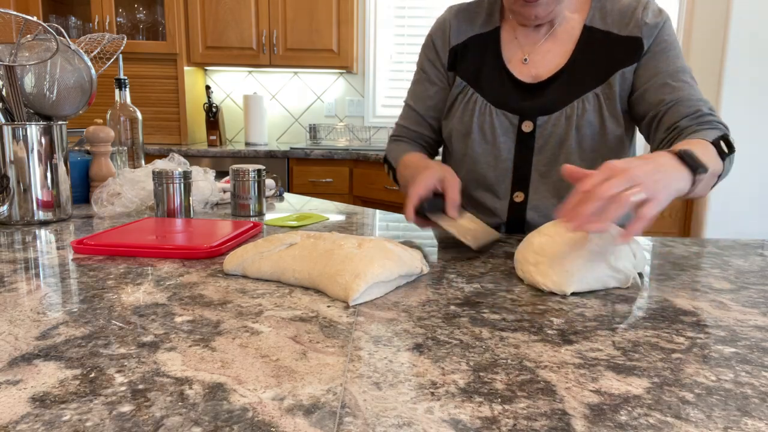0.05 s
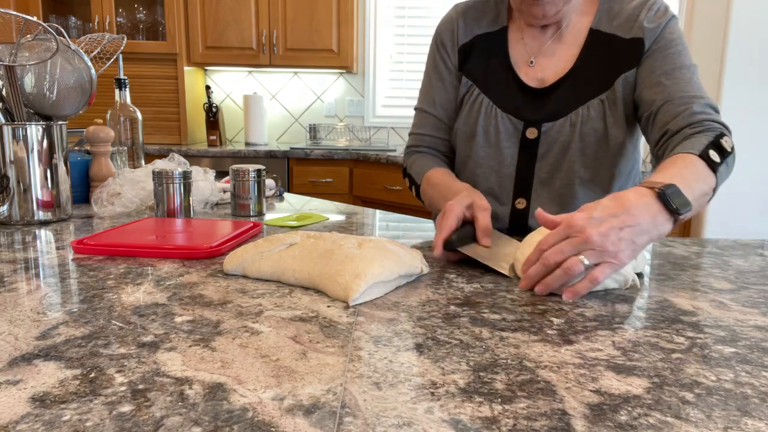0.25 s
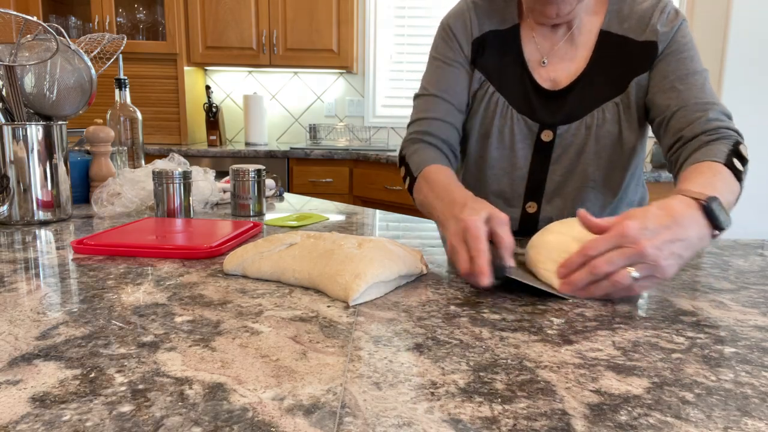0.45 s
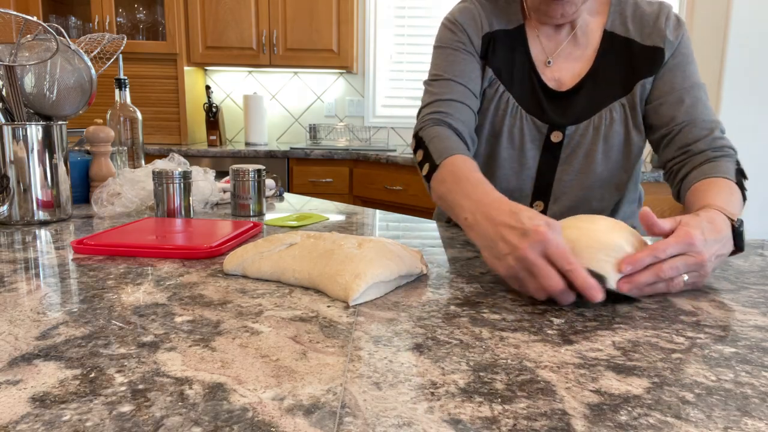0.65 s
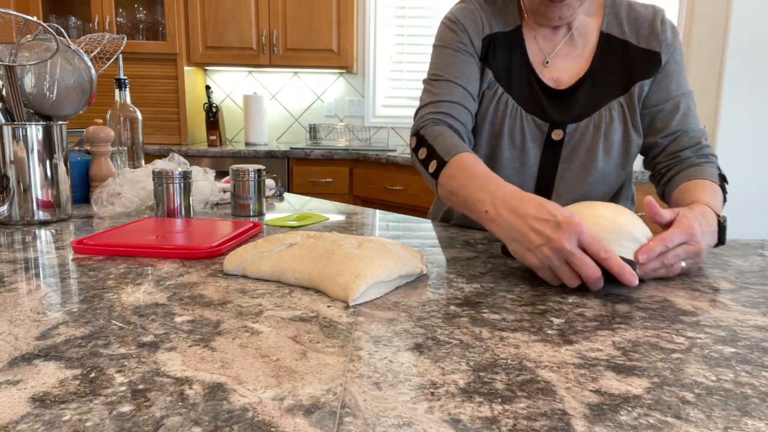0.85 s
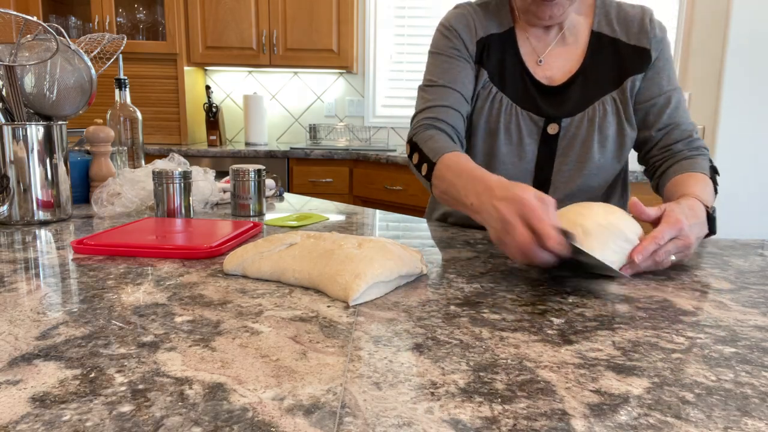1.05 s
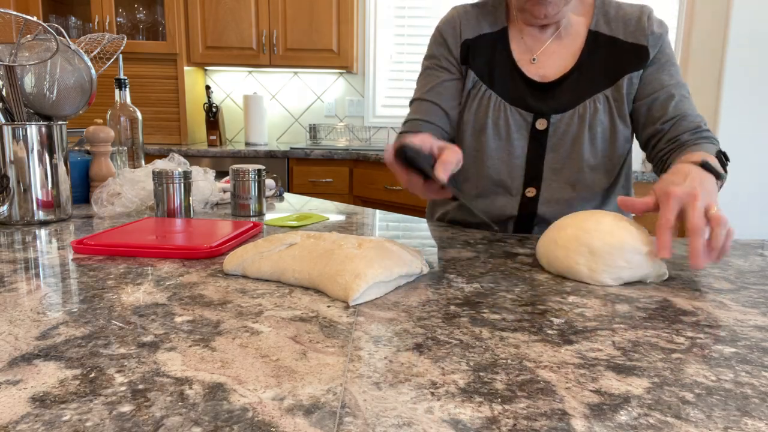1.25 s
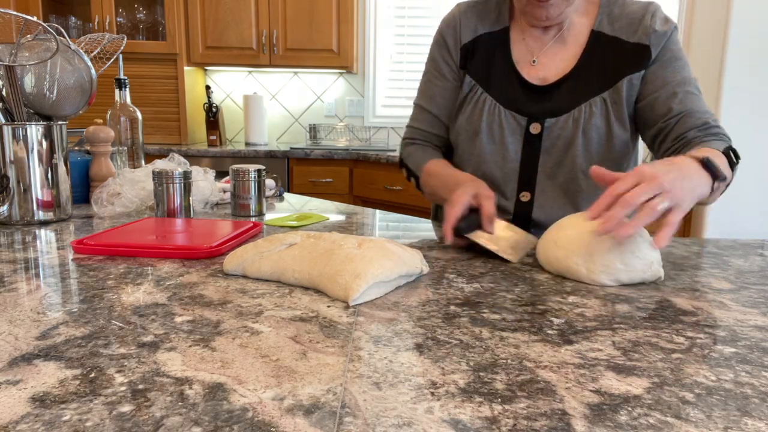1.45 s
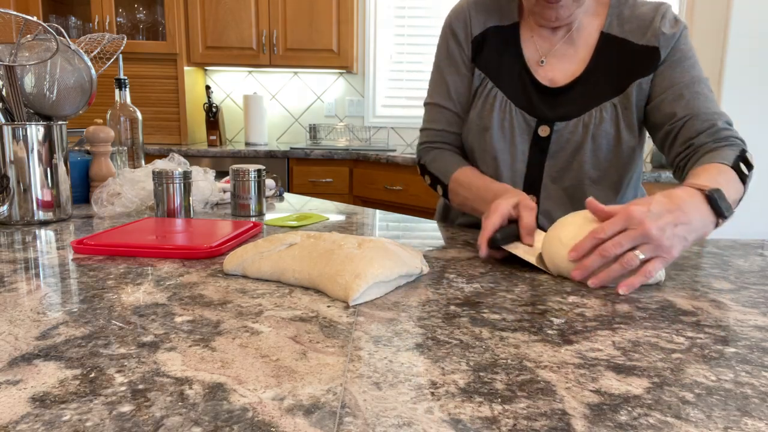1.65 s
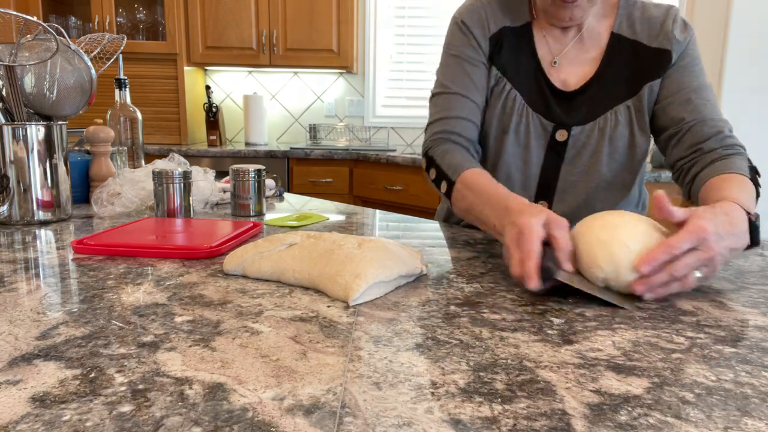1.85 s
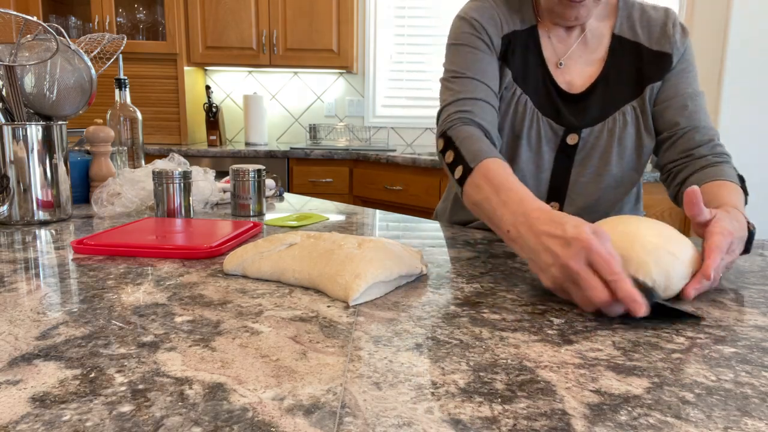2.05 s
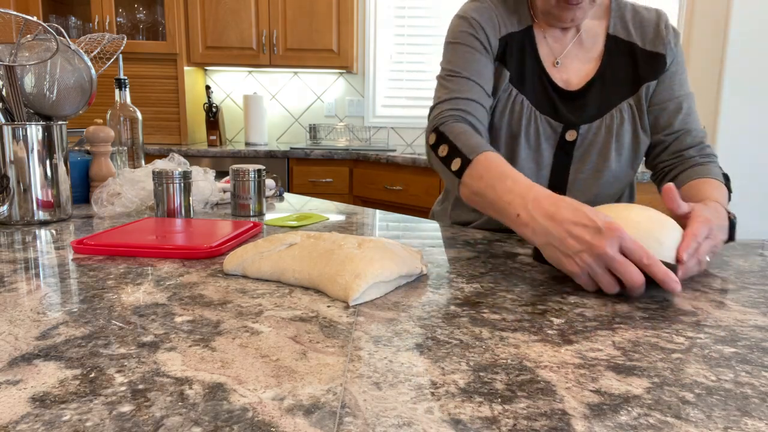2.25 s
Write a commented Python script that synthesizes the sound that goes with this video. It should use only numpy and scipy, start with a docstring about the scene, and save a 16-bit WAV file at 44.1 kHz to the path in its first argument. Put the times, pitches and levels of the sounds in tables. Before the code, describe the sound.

Close stereo pickup in a lively, quiet kitchen: a steel blade clacks and grates on stone, small taps follow, sticky dough snaps free and plops, then a rattling corner knock leads into more gritty, faintly singing scrapes.

```python
"""Under a faint hum and air noise, a steel bench scraper lands flat on a stone counter at 0.13 s, as short bright
cracks together with ringing modes, chatters, and slides under a ball of dough with grainy hiss and rasp. Near 1.06 s
the dough peels free in bright noise snaps, then plops at 1.12 s, a tone falling in pitch. From 1.42 s the blade lands
on and near its corner, then slides on, its edge singing as moving narrow-band noise. The kitchen's reverberation is
decaying noise in bands; a small stereo microphone hears the near sounds later and louder on the left."""
import sys
import numpy as np
from scipy import signal
from scipy.fft import rfft, irfft
from scipy.io import wavfile

SR = 44100
rng = np.random.default_rng(int(sys.argv[2]) if len(sys.argv) > 2 else 0)


def int16_out(signal):
    """Quantize to a 16-bit WAV file."""
    q = np.round(np.clip(np.atleast_2d(signal).T, -1, 1) * 32767)
    wavfile.write(sys.argv[1], SR, q.astype(np.int16))


N = 101429  # samples

# room air, spectral shape: f/Hz, density/dB
AIR_SPECTRUM = [(15, -52), (30, -9.5), (60, -1.5), (120, -0.5), (180, -2), (300, -11), (600, -10.5),
                (1200, -39), (2500, -30.5), (6000, -29), (16500, -34)]
# appliance hum partials: f/Hz, rms level before waver/dB
HUM_PARTIALS = [(60, -90), (120, -75.5), (180, -81)]
AIR_RMS_DB, HUM_WAVER_DB, HUM_WAVER_HZ = -71.5, 2, 6.0
# left-right correlation of diffuse sound: f/Hz, correlation/1
STEREO_CORRELATION = [(30, 0.293), (120, 0.72), (250, 0.62), (600, 0.033), (2000, 0.033), (8000, 0.5)]

# blade and dough sliding: t/s, hiss level/dB, rasp level/dB
SLIDE_LEVELS = [(0, -125, -81.5), (.07, -85, -101), (.12, -107, -62), (.15, -57.5, -42.5), (.3, -62, -61),
                (.45, -62.5, -66.5), (.62, -70, -75), (.7, -65.5, -70), (.88, -65, -71), (.94, -79, -85),
                (.98, -69.5, -76.5), (1.035, -64, -66), (1.06, -43.5, -53.5), (1.09, -61, -61),
                (1.22, -65.5, -108), (1.28, -88.5, -116), (1.42, -91.5, -74.5), (1.46, -69, -57.5),
                (1.55, -59, -62), (1.63, -59, -61), (1.7, -63.5, -71), (1.76, -54.5, -64), (1.8, -63, -70),
                (1.95, -67, -72.5), (2.03, -73.5, -78.5), (2.08, -55, -63.5), (2.14, -49.5, -59),
                (2.2, -57.5, -58), (2.25, -58, -63), (2.3, -59.5, -65)]
# treble hiss, spectral shape: f/Hz, density/dB
HISS_SPECTRUM = [(3000, -28.5), (4500, -32), (6500, -0.5), (8500, -1.5), (10500, -1), (12500, -1),
                 (14500, -8.5), (16500, -5.5)]
# mid rasp, spectral shape: f/Hz, density/dB
RASP_SPECTRUM = [(300, -75), (700, -2.5), (1100, 2.5), (1500, -1), (1950, 4), (2600, -2.5), (3500, 3),
                 (4400, 2), (6000, 1.5), (9000, -15)]
# soft rumble of dough rolling: t/s, level/dB
KNEAD_LEVELS = [(.8, -100), (.92, -79.5), (1.0, -73.5), (1.04, -71.5), (1.08, -71), (1.12, -89),
                (1.2, -105), (1.27, -111), (1.3, -100)]
GRIT_PER_S, GRIT_MEAN_EXCESS_DB = 6500, 1.5
LUMP_DB, LUMP_HZ = 1, 82  # uneven rubbing

# singing edge: t/s, centre f/Hz, level/dB
SING_TRACK = [(0, 1750, -93), (.06, 1770, -72), (.12, 1750, -93), (.14, 1800, -100), (.88, 2300, -74.5),
              (.95, 2400, -77), (1.04, 2497, -73.5), (1.055, 1699, -76), (1.075, 1609, -80),
              (1.082, 1929, -47), (1.095, 1525, -63.5), (1.12, 1350, -63), (1.2, 1318, -100),
              (2.03, 2473, -99.5), (2.065, 2580, -65), (2.11, 2493, -76), (2.145, 2690, -57.5),
              (2.21, 2850, -62.5), (2.25, 2890, -71), (2.3, 2790, -73)]
SING_CORNER_HZ = 256

# blade edge strikes stone: t/s, crack level/dB, ring level/dB, landing/1 (0 flat, 1 corner)
KNOCKS_TABLE = [(0.1259, -23, -38.5, 0.012), (0.1328, -31.5, -36, 0.036), (1.4236, -28.5, -46, 1),
                (1.4352, -28.5, -49, 0.6), (1.4447, -32.5, -44, 0.95), (1.451, -33, -47, 0.58)]
# short bright edge modes: f/Hz, flat level/dB, corner level/dB, t60/s
CRACK_MODES = [(1930, 2.5, -6.5, 0.022), (2680, -17, -14, 0.014), (3780, -3, -7, 0.0074),
               (4730, -6, -10.5, 0.016), (5350, 1.5, 0, 0.0031), (6480, 3.5, 1, .004),
               (8590, 2.5, -0.5, 0.0069), (9430, 1, -6.3, 0.0087), (9940, 6.5, 3.2, 0.0027),
               (11560, 1.5, -3.5, 0.0083), (13000, 8.5, 1.5, 0.0018), (14200, -6, -9.5, 0.0023),
               (15600, -4.5, -11.5, 0.0036)]
# blade and counter modes: f/Hz, flat level/dB, corner level/dB, t60/s
BLADE_MODES = [(315.7, -5, -18.5, 0.19), (398.5, -14.5, -18, 0.13), (556, -19, -3, 0.095),
               (864.6, -5, -8, 0.07), (962, 4, -14.5, 0.066), (1112, -6, -4.5, 0.27),
               (1157, -17, -0.5, 0.08), (1239, -7, 2, 0.09), (1307, -9, -3, 0.16), (1336, -8.5, -7, 0.088),
               (1607, -3, -4, 0.063), (1785, -1.5, 6, 0.049), (1829, 7.5, -1, 0.074), (1861, -5, 1, 0.096),
               (1975, -1, -2.5, 0.059), (3284, -1.5, -8, 0.1)]
GRIND_PEAK_S, PUSH_S, STRIKE_SPREAD_DB = 0.0006, 0.00004, 1.5

# cabinet booms after blows: t/s, peak envelope/dB, f/Hz, time to peak/s
BOOM_TABLE = [(0.132, -41.5, 117.6, 0.028), (1.125, -52.5, 66.6, 0.014), (1.431, -45, 112.5, 0.054)]

# small short taps, each a brief note with a click: t/s, note level/dB, f/Hz, t60/s, click level/dB
TAP_NOTES = [(0.2147, -29, 1120, 0.013, -58), (.649, -46, 1137, 0.029, -54.5),
             (0.989, -58, 3030, 0.021, -61.5), (1.467, -38.5, 1273, 0.12, -84),
             (1.573, -44, 1151, 0.044, -69)]
# modes of the tap click: f/Hz, level/dB, t60/s
TAP_CLICK_MODES = [(1870, -3, 0.045), (2740, -3.5, 0.012), (4760, 1.5, .008)]

# sticky dough snapping off stone: t/s, level before rise/dB, decay constant/s
SNAP_EVENTS = [(1.059, -35, 0.0034), (1.064, -39, 0.006), (1.0695, -39.5, 0.0075), (1.0777, -28.5, 0.0011),
               (1.0791, -22, 0.0018)]
# snap noise, spectral shape: f/Hz, density/dB
SNAP_SPECTRUM = [(500, -51), (1600, -2), (3000, -2), (5000, 3.5), (8200, 10), (11700, 10), (14000, 6),
                 (16500, 1.5)]
SNAP_RISE_S = 0.00083

PLOP_S, PLOP_GAIN_DB = 1.1222, -31.5
PLOP_FROM_HZ, PLOP_TO_HZ = 730, 150.8
PLOP_FALL_S, PLOP_RISE_S, PLOP_DECAY_S = 0.0023, 0.0012, 0.0082

# reverberation time: f/Hz, t60/s
ROOM_T60_CURVE = [(60, 0.29), (130, 0.5), (300, 0.43), (1000, 0.72), (2500, 0.52), (6000, 0.21),
                  (16000, 0.35)]
# reverberation gain: f/Hz, level/dB
ROOM_GAIN_CURVE = [(60, -12), (130, 12), (300, 11.5), (1000, 6), (2500, 4), (6000, 0.5), (16000, -7.5)]
ROOM_RISE_S = 0.00033
PEEL_ROOM_DB = -7  # peeling dough and singing edge reach the room less
PLOP_ROOM_DB = -11.5  # the dough shields the plop from the room

HIT_LAG_SAMPLES, SLIDE_LAG_SAMPLES, LEFT_DB = 1.43, 3.01, 1.9
SHARED_ABOVE_HZ, TREBLE_LAG_SAMPLES, STOPBAND_HZ = 6400, 10.74, 16850


def amp(db):
    """Amplitude ratio from dB."""
    return 10 ** (np.asarray(db) / 20)


def unit(x):
    """Scale to rms 1."""
    return x / np.sqrt(np.mean(x ** 2) + 1e-20)


def at_hz(points, hz):
    """Interpolate a table over log frequency."""
    p = np.array(points)
    return np.interp(np.log(np.maximum(hz, 1)), np.log(p[:, 0]), p[:, 1])


def colour(x, spectrum):
    """Shape by a spectrum in dB."""
    n = x.shape[-1]
    gain = amp(at_hz(spectrum, np.fft.rfftfreq(n, 1 / SR)))
    return irfft(rfft(x) * gain, n)


def level(rows, column):
    """Gain curve over time from a dB column."""
    p = np.array(rows)
    return amp(np.interp(np.arange(N) / SR, p[:, 0], p[:, column]))


def since(start_s):
    """Seconds since an onset, 0 before it."""
    return np.maximum(np.arange(N) / SR - start_s, 0)


def bandpass(x, low_hz, high_hz):
    """Butterworth band."""
    return signal.sosfilt(signal.butter(2, [low_hz, high_hz], "band", fs=SR, output="sos"), x)


def drift(corner_hz):
    """Noise through two equal low-pass poles, rms 1."""
    r = np.exp(-2 * np.pi * corner_hz / SR)
    noise = rng.standard_normal(N + SR)
    return unit(signal.lfilter([1], [1, -2 * r, r * r], noise)[SR:])  # first second settles the filter


def ring(x, hz, t60_s):
    """One decaying mode: a two-pole resonator."""
    r, w = amp(-60 / (t60_s * SR)), 2 * np.pi * hz / SR
    return signal.lfilter([0, np.sin(w)], [1, -2 * r * np.cos(w), r * r], x + 1e-18)


def clicks(s, db):
    """Impulses at given times."""
    out = np.zeros(N)
    out[(s * SR).astype(int)] = amp(db)
    return out


def soft(x):
    """Rounded contact: low-pass push, then a high-pass below the lowest mode."""
    r = np.exp(-1 / (PUSH_S * SR))
    pushed = signal.lfilter([1 - r], [1, -r], x)
    return signal.sosfilt(signal.butter(2, 220, "high", fs=SR, output="sos"), pushed)


def pair(mid, side):
    """Left and right noise, correlated by frequency through a mid-side mix."""
    n = len(mid)
    alike = np.clip(at_hz(STEREO_CORRELATION, np.fft.rfftfreq(n, 1 / SR)), 0, 1)
    common = np.sqrt(1 + alike) * rfft(mid)
    opposed = np.sqrt(1 - alike) * rfft(side) * [[1], [-1]]
    return irfft(common + opposed, n)


def delay(samples):
    """Spectrum of a fractional delay."""
    return np.exp(-2j * np.pi * np.fft.rfftfreq(N) * samples)


def room_tone():
    """Broad air noise and wavering hum partials."""
    t = np.arange(N) / SR
    air = unit(pair(*colour(rng.standard_normal((2, N)), AIR_SPECTRUM)))
    hum = 0
    for hz, db in HUM_PARTIALS:
        gain = np.sqrt(2) * amp(db + HUM_WAVER_DB * drift(HUM_WAVER_HZ))
        hum = hum + gain * np.sin(2 * np.pi * (hz * t + rng.random()))
    return amp(AIR_RMS_DB) * air + hum


def grit(spectrum):
    """Flour grains crushed under the edge: random impulses of uneven size and sign."""
    excess_db = GRIT_MEAN_EXCESS_DB * np.minimum(rng.exponential(1, N), 5)
    size = amp(excess_db) * rng.choice([-1, 1], N)
    present = rng.random(N) < GRIT_PER_S / SR
    return unit(colour(size * present, spectrum))


def slide():
    """Lumpy hiss and rasp of grains under the edge, plus the dough's low rumble."""
    rumble = unit(bandpass(rng.standard_normal(N), 300, 800))
    lumps = amp(LUMP_DB * drift(LUMP_HZ))
    hiss = level(SLIDE_LEVELS, column=1) * grit(HISS_SPECTRUM)
    rasp = level(SLIDE_LEVELS, column=2) * grit(RASP_SPECTRUM)
    return lumps * (hiss + rasp) + level(KNEAD_LEVELS, column=1) * rumble


def sing():
    """Rubbing edge: narrow noise on a quadrature carrier whose centre follows the stroke."""
    p = np.array(SING_TRACK)
    centre_hz = np.interp(np.arange(N) / SR, p[:, 0], p[:, 1])
    phase = 2 * np.pi * np.cumsum(centre_hz) / SR
    band = drift(SING_CORNER_HZ) * np.cos(phase) + drift(SING_CORNER_HZ) * np.sin(phase)
    return level(SING_TRACK, column=2) * band


def strike(db, modes, corner):
    """Every knock excites every mode, by how the blade lands."""
    times_s = np.array(KNOCKS_TABLE)[:, 0]
    jitter_db = rng.normal(0, STRIKE_SPREAD_DB, (len(times_s), len(modes)))
    share = np.clip(corner, 0, 1)
    out = 0
    for k, (hz, flat_db, corner_db, t60_s) in enumerate(modes):
        mode_db = db + (1 - share) * flat_db + share * corner_db + jitter_db[:, k]
        out = out + (-1) ** k * ring(clicks(times_s, mode_db), hz, t60_s)
    return out


def knocks():
    """Edge on stone: a briefly grinding bright crack and softly pushed ringing modes."""
    _, crack_db, ring_db, corner = np.transpose(KNOCKS_TABLE)
    n = SR // 200  # 5 ms
    t = np.arange(n) / (GRIND_PEAK_S * SR)
    grind = unit(rng.choice([-1, 1], n) * t * np.exp(-t)) / np.sqrt(n)  # unit energy
    crack = signal.lfilter(grind, [1], strike(crack_db, CRACK_MODES, corner))
    return crack + soft(strike(ring_db, BLADE_MODES, corner))


def thump():
    """Cabinet under the counter: a low sine that swells, then dies."""
    out = 0
    for s, db, hz, peak_s in BOOM_TABLE:
        t = since(s)
        swell = (t / peak_s * np.exp(1 - t / peak_s)) ** 2
        out = out + amp(db) * swell * np.sin(2 * np.pi * hz * t)
    return out


def taps():
    """A short one-mode note with a bright multi-mode click on its front."""
    table = np.array(TAP_NOTES)
    click = clicks(table[:, 0], table[:, 4])
    notes = sum(ring(clicks(np.array([s]), db), hz, t60_s) for s, db, hz, t60_s, _ in TAP_NOTES)
    bright = sum(amp(db) * ring(click, hz, t60_s) for hz, db, t60_s in TAP_CLICK_MODES)
    return soft(notes) + bright


def snaps():
    """Sticky dough letting go: brief bright noise bursts."""
    envelope = 0
    for s, db, decay_s in SNAP_EVENTS:
        t = since(s)
        envelope = envelope + amp(db) * (1 - np.exp(-t / SNAP_RISE_S)) * np.exp(-t / decay_s)
    return envelope * unit(colour(rng.standard_normal(N), SNAP_SPECTRUM))


def plop():
    """Air squeezed from under the dough: a few cycles falling in pitch."""
    t = since(PLOP_S)
    extra_turns = (PLOP_FROM_HZ - PLOP_TO_HZ) * PLOP_FALL_S * (1 - np.exp(-t / PLOP_FALL_S))
    turns = PLOP_TO_HZ * t + extra_turns
    envelope = (1 - np.exp(-t / PLOP_RISE_S)) * np.exp(-t / PLOP_DECAY_S)
    return -amp(PLOP_GAIN_DB) * envelope * np.sin(2 * np.pi * turns)


def kitchen(x):
    """Reverberation: convolution with stereo noise dying band by band."""
    t, edges_hz = np.arange(SR) / SR, np.geomspace(45, 18000, 14)
    white, tail = pair(*rng.standard_normal((2, SR))), 0
    for low, high in zip(edges_hz, edges_hz[1:]):
        hz = np.sqrt(low * high)
        t60_s = at_hz(ROOM_T60_CURVE, hz)
        decay = amp(at_hz(ROOM_GAIN_CURVE, hz) - 60 * t / t60_s)
        energy_norm = np.sqrt(t60_s * SR / np.log(1e6))
        tail = tail + bandpass(white, low, high) * decay / energy_norm
    tail = tail * (1 - np.exp(-t / ROOM_RISE_S))
    return signal.fftconvolve(x[None], tail, axes=1)[:, :N]


def scene():
    """Near sounds reach the left port slightly later and louder; room, booms and tone are added."""
    rub, band, hits, peel, drop = slide(), sing(), knocks() + taps(), snaps(), plop()
    struck = rfft(hits + peel + drop) * delay(HIT_LAG_SAMPLES)
    rubbed = rfft(rub + band) * delay(SLIDE_LAG_SAMPLES)
    left = amp(LEFT_DB) * irfft(struck + rubbed, N)
    right = hits + peel + rub + band + drop
    room = kitchen(hits + rub + amp(PEEL_ROOM_DB) * (peel + band) + amp(PLOP_ROOM_DB) * drop)
    return np.array([left, right]) + room + thump() + room_tone()


def record(dry):
    """The right port's treble feeds both channels, later on the left; the top is cut."""
    left, right = rfft(dry)
    hz = np.fft.rfftfreq(N, 1 / SR).clip(1)
    share = 1 / (1 + (SHARED_ABOVE_HZ / hz) ** 40)
    left = np.sqrt(1 - share ** 2) * left + share * right * delay(TREBLE_LAG_SAMPLES)
    top_cut = signal.cheby2(14, 70, STOPBAND_HZ, fs=SR, output="sos")
    return signal.sosfilt(top_cut, irfft([left, right], N))


dry = scene()
out = record(dry)
int16_out(out)
```